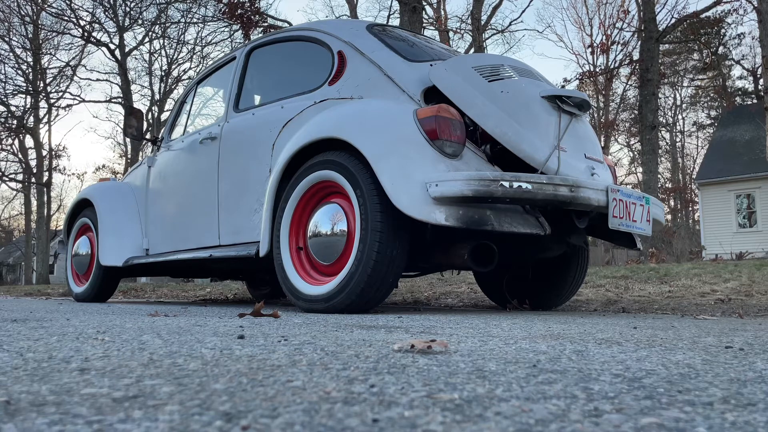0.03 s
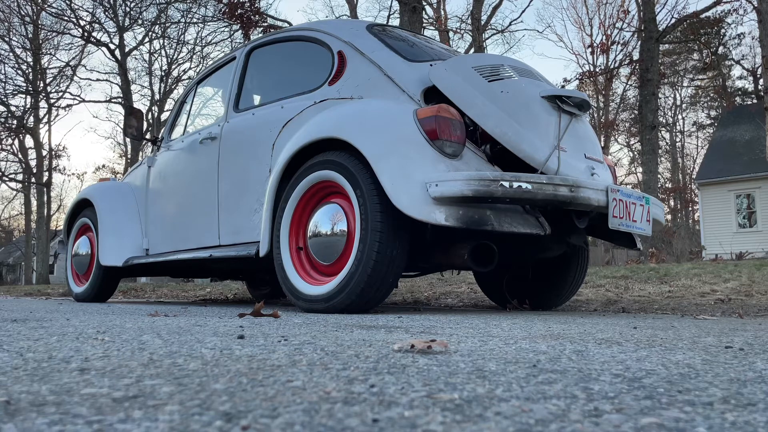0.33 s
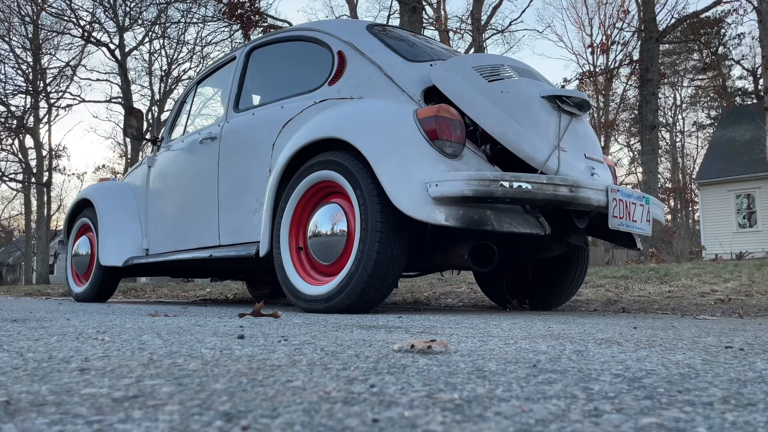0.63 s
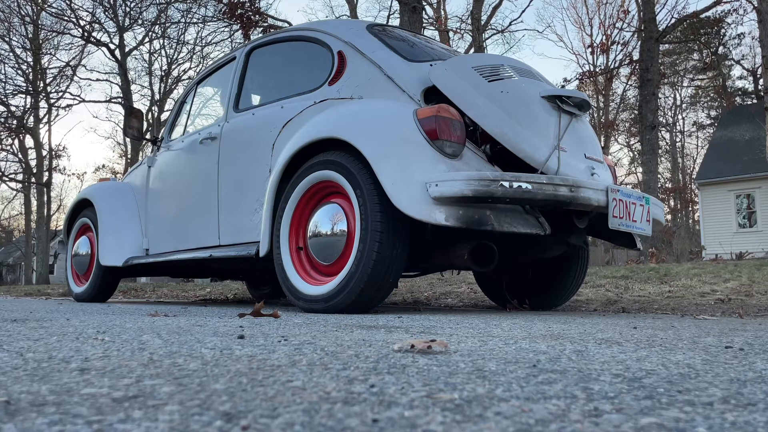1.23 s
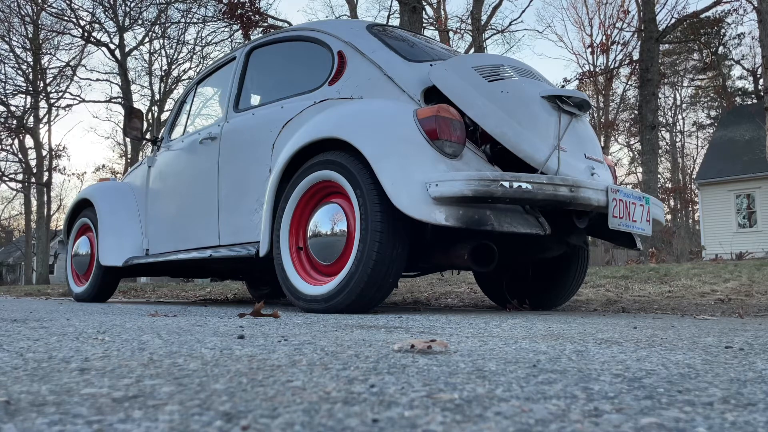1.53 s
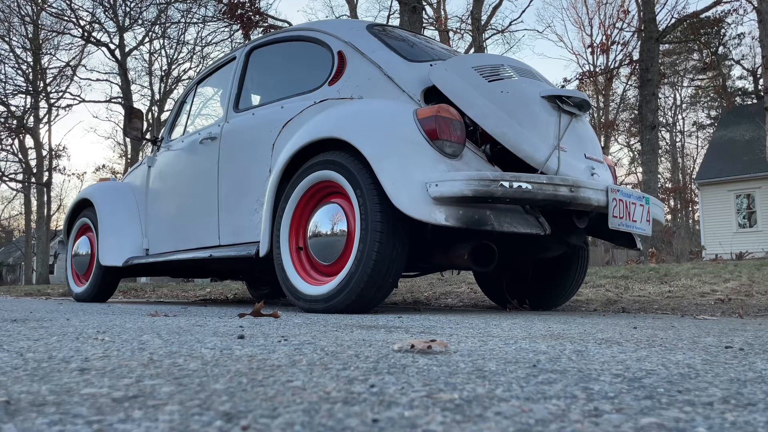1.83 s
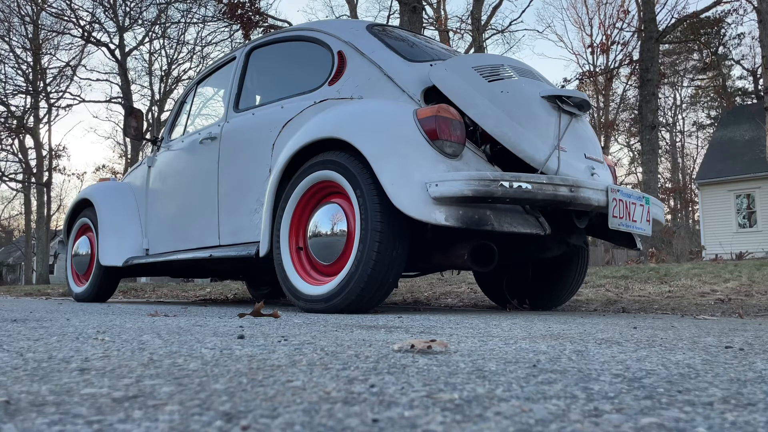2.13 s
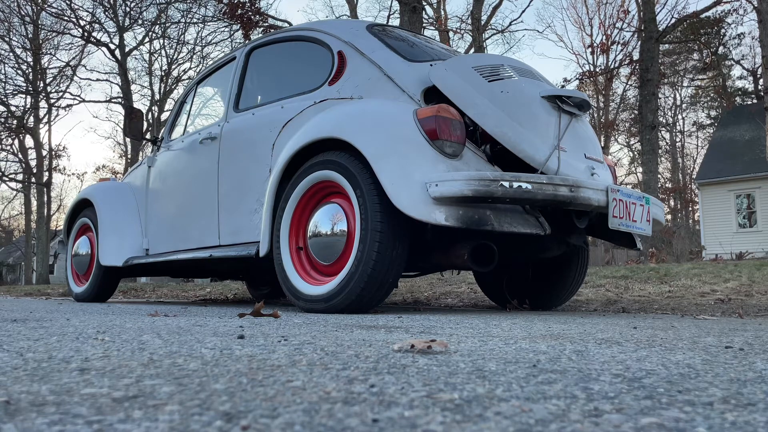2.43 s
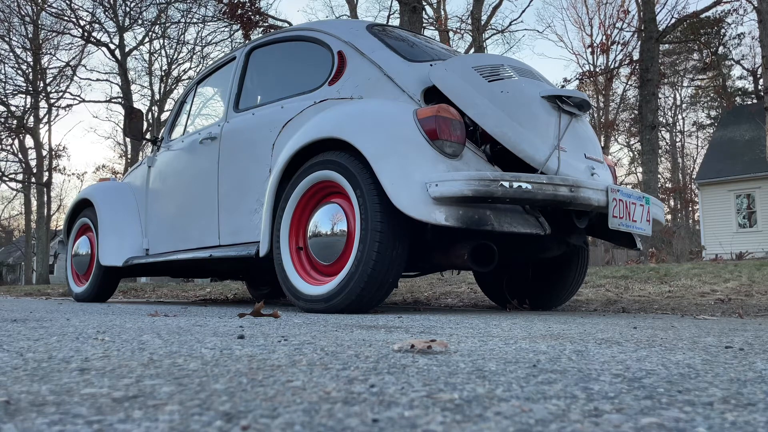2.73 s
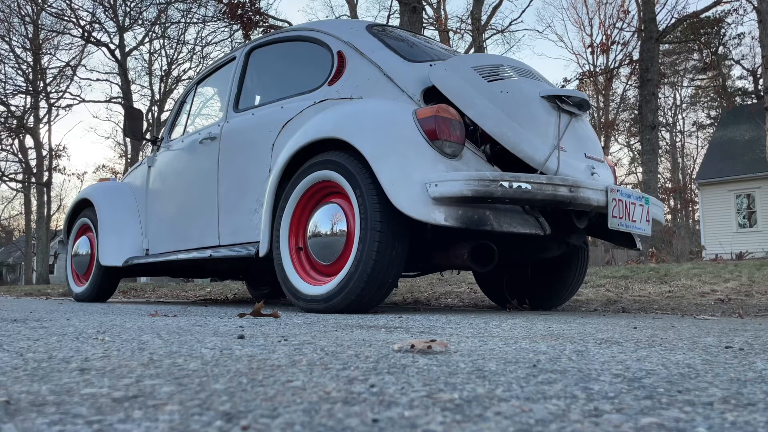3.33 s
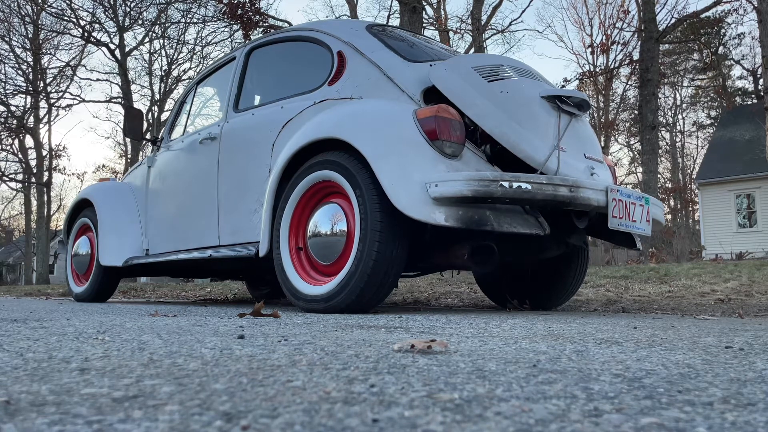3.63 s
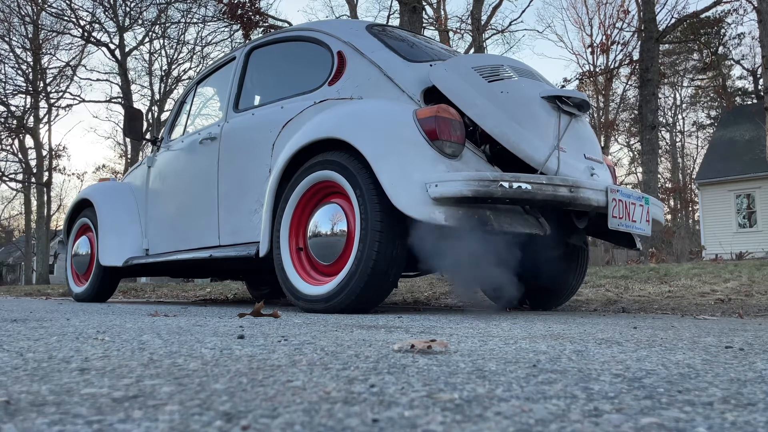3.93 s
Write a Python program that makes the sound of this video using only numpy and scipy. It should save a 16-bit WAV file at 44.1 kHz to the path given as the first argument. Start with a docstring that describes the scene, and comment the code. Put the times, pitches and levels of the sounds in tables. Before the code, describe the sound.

An old car starting up, its starter grinding before the exhaust pops and booms irregularly.

```python
"""A cold car engine starts on a driveway, heard from low down a few metres behind it. Distant traffic rumbles
and a few faint ticks of key and pedal sound. At 2.5 s the starter slams in and grinds the engine round: gear
teeth growl and rasp, loose metal clinks, the exhaust puffs without firing. From 3.1 s the cylinders catch in
uneven groups over the grinding, each firing a ringing crack of the tailpipe, a burst of gas and a boom of the
silencer, with dull echoes from the yard."""
import sys
import numpy as np
from scipy import signal
from scipy.fft import rfft, irfft
from scipy.io import wavfile
from scipy.ndimage import uniform_filter1d

SR = 44100
rng = np.random.default_rng(int(sys.argv[2]) if len(sys.argv) > 2 else 0)


def dump_mix(stems):
    """Bounce the given channels to the path in sys.argv[1] as a 16-bit WAV at rate SR."""
    frames = np.atleast_2d(stems).T  # one column per channel
    limited = np.clip(frames, -1, 1)  # hard clip at full scale
    pcm = np.round(limited * 32767).astype(np.int16)
    wavfile.write(sys.argv[1], SR, pcm)


N = 176400
T = np.arange(N) / SR
HZ = np.maximum(np.fft.rfftfreq(2 * N, 1 / SR), 1)

# Table levels are relative; each layer's gain comes on top.
# cylinders firing: start_s, boom_db, crack_db, bark_db, snarl_db, hiss_db, pitch_hz
FIRINGS = [(3.099, -7, -2.5, -15, -28, -22, 800), (3.138, -16, -16, -18.5, -17.5, -26.5, 503),
           (3.162, -5.5, -12.5, -10, -14, -16.5, 1115), (3.4323, -7.5, -1, -12.5, -31, -25.5, 793),
           (3.483, -6.5, -12, -11.5, -11, -20, 904), (3.711, -7.5, -2.5, -11.5, -23, -22.5, 779.5),
           (3.7563, -5.5, -8, -8, -26, -20.5, 1120), (3.7939, -6.5, -11, -11.5, -11.5, -24, 1026),
           (3.931, -7.5, -23.5, -11.5, -29, -24.5, 1230), (3.9679, -6.5, -21, -9.5, -12, -23.5, 1200)]
# exhaust puffs without a firing: start_s, level_db
PUFFS = [(2.584, -25.5), (2.631, -30), (2.711, -21), (2.834, -20.5), (2.869, -21.5), (2.977, -20.5),
         (3.012, -21), (3.253, -22), (3.362, -18.5), (3.645, -23.5), (3.895, -18)]
# deep silencer resonances: pitch_hz, width_hz, level_db
SILENCER_MODES = [(62.2, 10.7, 1), (83, 56, -12.5), (114, 13, -18.5)]
# hollow tailpipe resonances: pitch_hz, width_hz, level_db
PIPE_MODES = [(227, 18, -5), (369, 20, -1.5), (532, 36, 0), (696, 49, 7), (789, 25, 4.5), (940, 43, -7.5),
              (1050, 48, -17), (1257, 66, -10), (1450, 70, -17), (2280, 210, -17)]
# whistle of the gas jet: pitch_hz, width_hz, level_db
JET_MODES = [(3094, 97, 8), (3504, 240, 4), (4020, 490, 0.5), (4600, 70, 0), (5800, 150, -21),
             (6270, 59, -4)]
# body of the gas burst: frequency_hz, level_db
BARK_SPECTRUM = [(90, -11), (150, 1), (330, -0.5), (480, -7), (750, -7), (1180, 0.5), (1670, -12),
                 (2230, -10), (2900, -23), (5000, -43)]
# its biting midrange: frequency_hz, level_db
SNARL_SPECTRUM = [(1000, -19), (1500, 1.5), (2250, 7.5), (2900, -12), (4000, -35)]
# bright top of the jet and the clanks: frequency_hz, level_db
HISS_SPECTRUM = [(1200, -9), (2500, -2), (4000, -1), (5300, -5), (8000, -16.5), (10500, -11.5),
                 (13200, -21), (14300, -41)]

# starter speed, sagging at each compression: time_s, teeth_per_s
TOOTH_RATE = [(2.54, 156), (2.62, 486), (2.68, 598.3), (2.76, 483.7), (2.87, 552), (3.08, 560), (3.22, 960),
              (3.42, 700), (3.55, 1040), (3.7, 820), (4, 1170)]
# swells of the starter's grind, in four runs: time_s, growl_db, rasp_db
GRIND_RUNS = [
    [(2.6, -27, -51), (2.614, -34, -45.5), (2.79, -28.5, -28), (2.812, -35, -31.5), (2.826, -29, -34.5),
     (2.864, -36, -35), (2.876, -26.5, -30), (2.93, -34.5, -36.5), (2.95, -28, -29.5), (3.028, -30, -35),
     (3.06, -28.5, -23.5), (3.09, -23.5, -31)],
    [(3.21, -29.5, -36.5), (3.22, -32, -46), (3.246, -31, -33.5), (3.276, -40, -44), (3.425, -26, -28)],
    [(3.52, -35, -39), (3.612, -36.5, -45), (3.62, -31.5, -39), (3.696, -25, -32), (3.705, -22.5, -30)],
    [(3.83, -35, -40), (3.846, -36, -36.5), (3.878, -35, -48), (3.904, -31.5, -36), (3.925, -33.5, -37.5)],
]
# starter gear slamming into mesh and taking up slack: start_s, body_db, bright_db, decay_s
CLANKS = [(2.527, -37, -48, .03), (2.538, -26, -40, 0.025), (2.545, -23, -22, 0.011),
          (2.568, -23, -36.5, 0.032), (2.819, -20, -43, 0.044), (2.941, -23.5, -52, 0.053),
          (3.235, -19.5, -38.5, 0.038), (3.316, -24.5, -34.5, 0.024), (3.617, -24, -38.5, .03)]
# low body of the gears: frequency_hz, level_db
GROWL_SPECTRUM = [(50, 7), (110, 1.5), (250, 6), (430, 0.5), (700, -1), (1100, 3.5), (1750, -9), (2200, -7),
                  (3000, -15), (6000, -45)]
# scraping edge of the gears: frequency_hz, level_db
RASP_SPECTRUM = [(1000, -25), (2300, 0), (3000, -1.5), (3800, 4), (5200, -4), (8000, -18), (10500, -17),
                 (13200, -25), (14300, -49)]
# engine case resonances: pitch_hz, width_hz, level_db
CASE_MODES = [(215, 6.6, -1.5), (296, 11, -15), (370, 6.9, -8.5), (560, 49, -25), (720, 26, 2.5),
              (836, 43, 2.5), (1142, 30, -2.5), (1457, 59, 5.5), (2012, 25, 2), (2293, 48, -1),
              (3450, 59, 0.5)]

# engine lurching on its mounts: peak_s, level_db, decay_s
LURCHES = [(2.549, -26, 0.011), (2.577, -24.5, 0.023), (2.841, -22, 0.023), (3.15, -18, 0.022),
           (3.735, -16.5, 0.022)]
# dull thud of a lurch: frequency_hz, level_db
LURCH_SPECTRUM = [(70, -23), (140, -3), (300, 0), (430, -10.5), (550, -3.5), (800, -31), (2000, -46.5)]
# knocks on loose metal: peak_s, pitch_hz, level_db, decay_s
KNOCKS = [(3.178, 920, -16, 0.023), (2.825, 1000, -26.5, 0.032), (2.965, 1130, -23, .05)]
# thin clinks while cranking: peak_s, level_db
CLINKS = [(2.756, -38), (3.331, -39), (3.661, -32.5), (3.887, -44)]
# tinny colour of a clink: frequency_hz, level_db
CLINK_SPECTRUM = [(2000, -34), (6000, 2), (8000, -15), (10500, -2), (13000, -1), (15000, -18)]
# small ticks of key and pedal before the start: start_s, level_db, decay_s, pitch_hz
TICKS = [(1.731, -73, .005, 7500), (2.007, -71, .012, 6800), (2.152, -67, .003, 10200),
         (2.224, -63, .004, 5300), (2.251, -61, 0.0063, 7600), (2.295, -61.5, 0.0091, 2400),
         (2.432, -69, .004, 6800), (2.498, -54, .002, 10700)]
# fine grain of the ticks and rustle: frequency_hz, level_db
TICK_SPECTRUM = [(1500, -25), (2400, -4), (3000, -10), (5000, -3), (7300, -1), (8500, -9), (11000, -3.5),
                 (15000, -25)]
# swell of the faint rustle: time_s, level_db
RUSTLE_SWELL = [(1.7, -23), (2.0, -14), (2.15, -14), (2.28, -6), (2.4, -14), (2.55, -9)]

# stereo width of the car: frequency_hz, side_minus_mid_db
CAR_WIDTH = [(60, -20), (300, -20), (1200, -17), (1900, -4.5), (4000, -7), (5200, 2.5), (8500, 4),
             (11500, -12), (14000, 5)]
# stereo lean of the car: frequency_hz, left_minus_right_db
CAR_BALANCE = [(60, 1.5), (130, -0.5), (290, 0.5), (640, -3), (1410, 0), (3100, 0.5), (6820, 1.5),
               (15000, -4)]
# distant traffic bed: frequency_hz, level_db
TRAFFIC_SPECTRUM = [(20, -30), (30, -21), (42, -4.5), (58, -1.5), (90, -4), (125, -10), (250, -17),
                    (430, -22.5), (800, -22.5), (1350, -30.5), (3200, -51.5), (7500, -62), (12500, -65),
                    (15000, -85)]
# stereo width of the traffic: frequency_hz, side_minus_mid_db
TRAFFIC_WIDTH = [(60, -12.5), (130, -12), (290, -3), (640, 6), (1410, 3), (3100, -1.5), (6820, -1),
                 (15000, -1)]


def silencer_booms():
    """The low punch: each slug of gas sets the silencer swinging."""
    delay_s, width_s = 0.01135, 0.0015
    slugs = [(s + delay_s, boom_db) for s, boom_db, *_ in FIRINGS] + PUFFS
    push = sum(from_db(db) * burst(s + 0.0021, width_s, width_s) for s, db in slugs)
    boom = resonate(push, SILENCER_MODES)
    return from_db(15.5) * low_cut(low_cut(boom, hz=50), hz=43)


def tailpipe_cracks():
    """The attack: a steep pressure front rings the tailpipe, and again after running back along it."""
    width_hz, echo_s, echo_db = 67, .0085, -4.5
    low_mode = (660, 60, -10.5)  # pitch_hz, width_hz, level_db
    ring = 0
    for s, _, crack_db, *_, pitch_hz in FIRINGS:
        fronts = np.zeros(N)
        fronts[int(s * SR)] = from_db(crack_db)
        fronts[int((s + echo_s * rng.uniform(.9, 1.1)) * SR)] = from_db(crack_db + echo_db)
        ring = ring + resonate(fronts, [(pitch_hz, width_hz, 0), low_mode])
    return high_cut(ring, hz=1860) * SR / (2 * np.pi * width_hz)  # make-up gain for the narrow ring


def gas_blasts():
    """Gas rushes out after each front: a hollow bark and a snarl in the pipe, a short hiss at its mouth."""
    gas, snarl, jet = noise(BARK_SPECTRUM), steady(noise(SNARL_SPECTRUM)), steady(noise(HISS_SPECTRUM))
    pipe = hiss = 0
    for s, _, _, bark_db, snarl_db, hiss_db, pitch_hz in FIRINGS:
        swell = burst(s + 0.0064, rise_s=0.0036, decay_s=0.0081)
        tail = from_db(-12) * burst(s + 0.0064, rise_s=0.0036, decay_s=0.023)
        bark = steady(ringing(gas, [(pitch_hz, 420, 0)], ring_db=-3))
        pipe += from_db(bark_db) * (swell + tail) * bark
        pipe += from_db(snarl_db) * burst(s + 0.005, rise_s=.002, decay_s=0.0057) * snarl
        hiss += from_db(hiss_db) * burst(s + 0.0072, rise_s=0.0028, decay_s=0.0067) * jet
    return ringing(pipe, PIPE_MODES, ring_db=-2.5) + from_db(2.5) * ringing(hiss, JET_MODES, ring_db=0.5)


def starter_grind():
    """Gear teeth strike unevenly at cranking speed: a growl, a rasp and a whine at their third harmonic."""
    on_s, spin_up_s = 2.54, .03
    speed_jitter, play_teeth, rattle_share = .014, .085, 0.52
    tooth_rate = curve(TOOTH_RATE) * (1 + speed_jitter * drift(60))
    teeth = np.cumsum(tooth_rate) / SR
    teeth_struck = np.maximum.accumulate(np.floor(teeth + play_teeth * drift(300)))
    strikes = np.diff(teeth_struck, prepend=0) * (1 + rng.standard_normal(N))
    strikes = rms_one(smear(strikes, decay_s=0.005))
    drive = strikes + rattle_share * rng.standard_normal(N)
    drive *= from_db(1.5 * drift(52))  # fast level flutter
    whine = from_db(-15 + 3.2 * drift(25)) * np.sin(2 * np.pi * 3 * teeth)
    times, growl_db, rasp_db = np.vstack(GRIND_RUNS).T
    growl = (coloured(drive, GROWL_SPECTRUM) + whine) * from_db(np.interp(T, times, growl_db) - 1)
    rasp = coloured(drive, RASP_SPECTRUM) * from_db(np.interp(T, times, rasp_db) - 5.5)
    return np.clip((T - on_s) / spin_up_s, 0, 1) * (growl + rasp)


def starter_clanks():
    """The gear slams into mesh and takes up its slack, each hit a low body with a bright edge."""
    body, bright = steady(noise(GROWL_SPECTRUM)), noise(HISS_SPECTRUM)
    clanks = 0
    for s, body_db, bright_db, decay_s in CLANKS:
        hit = from_db(body_db) * body + from_db(bright_db) * bright
        clanks += burst(s + 0.0036, 0.0022, decay_s) * hit
    return clanks


def engine_shake():
    """The engine lurches on its mounts with dull thuds and knocks loose metal, which rings on."""
    lurches = sum(from_db(db) * burst(s, 0.0041, decay_s) for s, db, decay_s in LURCHES)
    thuds = steady(noise(LURCH_SPECTRUM)) * lurches
    knocks = 0
    for s, pitch_hz, db, decay_s in KNOCKS:
        ring = np.sin(2 * np.pi * pitch_hz * T + .5 * drift(60))
        knocks += from_db(db) * burst(s, 0.0018, decay_s) * ring
    return thuds + knocks


def small_ticks():
    """Fine detail: a rustle and tiny ringing ticks of key and pedal, then thin clinks once the car shakes."""
    grain = noise(TICK_SPECTRUM)
    rustle = grain * from_db(-72 + curve(RUSTLE_SWELL) + 4 * drift(40))
    ticks = 0
    for s, db, decay_s, pitch_hz in TICKS:
        ring = ringing(grain, [(pitch_hz, 500, 0)], ring_db=3)
        ticks += from_db(db) * burst(s + 0.00124, 0.00088, decay_s) * ring
    clink_hits = sum(from_db(db) * burst(s, rise_s=0.00085, decay_s=0.0086) for s, db in CLINKS)
    return rustle + ticks + noise(CLINK_SPECTRUM) * clink_hits


def stereo_scatter(x, decay_s, share):
    """Ground and bodywork scatter the car's treble between the sides; its lean varies with frequency."""
    scatter = rfft(rng.standard_normal(N) * burst(0, 1, decay_s), 2 * N)
    scattered_share = np.clip(2 * share * HZ / (HZ + 1500), 0, 1)
    spread = np.sqrt(scattered_share) * scatter / scatter.std() - 1j * np.sqrt(1 - scattered_share)
    side = filtered(x, eq(CAR_WIDTH) * spread)
    lean = np.sqrt(eq(CAR_BALANCE))
    return np.array([filtered(x + side, lean), filtered(x - side, 1 / lean)])


def yard_echoes(x):
    """Dull scattered echoes from the trees and the house, different on each side."""
    send_db, reverb_time_s, build_s = -23.5, 0.48, 0.012
    tail = high_cut(rng.standard_normal((2, SR)), hz=3080, order=1)
    tail *= from_db(-60 * T[:SR] / reverb_time_s) * np.clip(T[:SR] / build_s, 0, 1)
    send = from_db(send_db) * low_cut(x, hz=150)
    return signal.fftconvolve(send[None], rms_one(tail) / np.sqrt(SR), axes=1)[:, :N]


def distant_traffic():
    """The bed: low rumble and wash of distant traffic, a little to the left."""
    mid = noise(TRAFFIC_SPECTRUM)
    side = filtered(noise(TRAFFIC_SPECTRUM), eq(TRAFFIC_WIDTH))
    level = from_db(-48 + drift(8.3))
    return level * np.array([from_db(0.65) * (mid + side), from_db(-0.76) * (mid - side)])


def from_db(db):
    """Decibels to gain."""
    return 10 ** (np.asarray(db) / 20)


def rms_one(x):
    """Scale to unit rms."""
    return x / np.sqrt(np.mean(x ** 2) + 1e-20)


def curve(points):
    """Automation line through (time_s, value) points."""
    return np.interp(T, *np.transpose(points))


def eq(points):
    """Gain at every frequency from (frequency_hz, level_db) points."""
    hz, db = np.transpose(points)
    return from_db(np.interp(np.log(HZ), np.log(hz), db))


def filtered(x, response):
    """Apply a frequency response."""
    return irfft(rfft(x, 2 * N) * response)[:N]


def low_cut(x, hz):
    """Roll off the bass."""
    return signal.sosfilt(signal.butter(2, hz, "high", fs=SR, output="sos"), x)


def high_cut(x, hz, order=2):
    """Roll off the top."""
    return signal.sosfilt(signal.butter(order, hz, fs=SR, output="sos"), x)


def coloured(x, spectrum):
    """Shape a sound with a spectrum, at unit rms."""
    return rms_one(filtered(x, eq(spectrum)))


def noise(spectrum):
    """Coloured noise at unit rms."""
    return coloured(rng.standard_normal(N), spectrum)


def drift(rate_hz):
    """Smooth random wobble at unit rms."""
    return rms_one(high_cut(rng.standard_normal(N), rate_hz))


def steady(x):
    """Level out the chance swings of a noise, as in a steady jet."""
    return x / np.sqrt(uniform_filter1d(x * x, size=220) + 1e-12)


def burst(peak_s, rise_s, decay_s):
    """Envelope that swells to 1 at peak_s and dies away."""
    age = T - peak_s
    depth = np.where(age < 0, (age / rise_s) ** 2 / 2, age / decay_s)
    return np.exp(-np.minimum(depth, 60))


def smear(x, decay_s):
    """Blur clicks over a short time without colouring them."""
    response = rfft(rng.standard_normal(N) * burst(0, 1, decay_s), 2 * N)
    return filtered(x, response / (abs(response) + 1e-9))


def resonate(x, modes):
    """Parallel resonances of (pitch_hz, width_hz, level_db)."""
    ring = 0
    for pitch_hz, width_hz, db in modes:
        radius = np.exp(-np.pi * width_hz / SR)
        gain = (1 - radius ** 2) / 2
        feedback = [1, -2 * radius * np.cos(2 * np.pi * pitch_hz / SR), radius ** 2]
        ring += from_db(db) * signal.lfilter([gain, 0, -gain], feedback, x + 1e-18)
    return ring


def ringing(x, modes, ring_db):
    """A sound plus the ringing it excites, at unchanged overall level."""
    ring = from_db(ring_db) * rms_one(resonate(x, modes))
    return rms_one(rms_one(x) + ring) * x.std()


def scene():
    """The mix: engine and exhaust spread in stereo, with yard echoes, over the traffic."""
    starter = ringing(starter_grind() + starter_clanks(), CASE_MODES, ring_db=-10.5)
    engine = low_cut(starter, hz=41) + engine_shake() + small_ticks()
    exhaust = silencer_booms() + tailpipe_cracks() + gas_blasts()
    car = stereo_scatter(engine, decay_s=0.019, share=0.24)
    car += stereo_scatter(exhaust, decay_s=0.0059, share=0.18)
    return car + yard_echoes(engine + exhaust) + distant_traffic()


def record(dry):
    """Round off the loudest peaks and cut the very top steeply."""
    stop_hz = 16500
    rounded = dry / (1 + dry ** 4) ** .25
    return signal.sosfilt(signal.cheby2(12, 70, stop_hz, fs=SR, output="sos"), rounded)


dry = scene()
out = record(dry)
dump_mix(out)
```